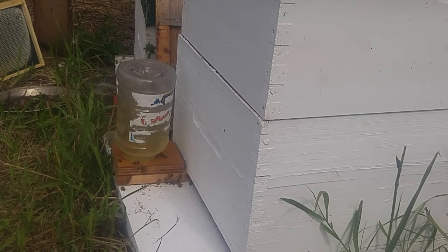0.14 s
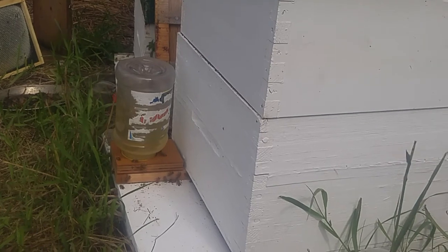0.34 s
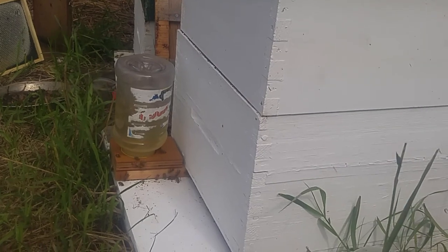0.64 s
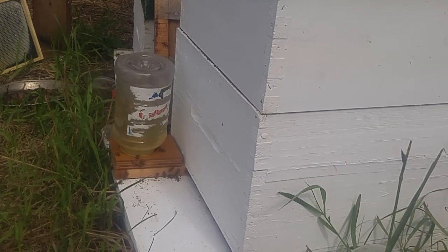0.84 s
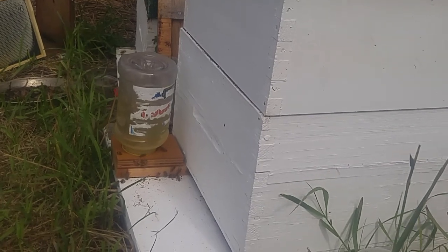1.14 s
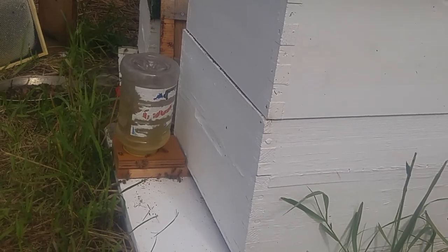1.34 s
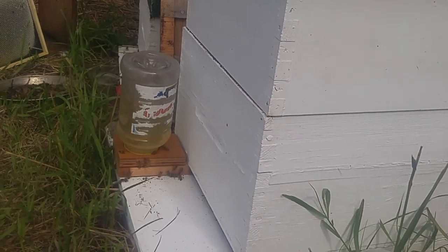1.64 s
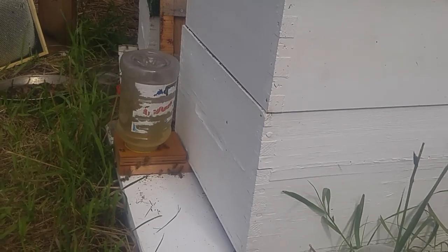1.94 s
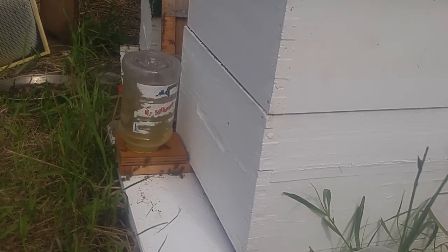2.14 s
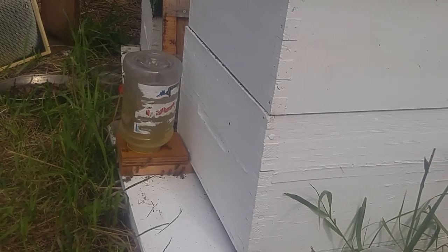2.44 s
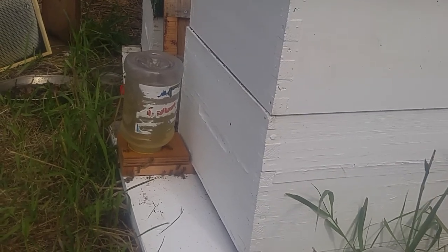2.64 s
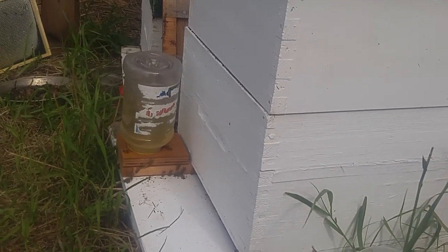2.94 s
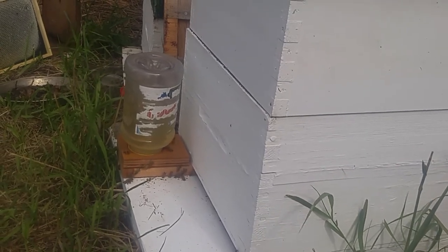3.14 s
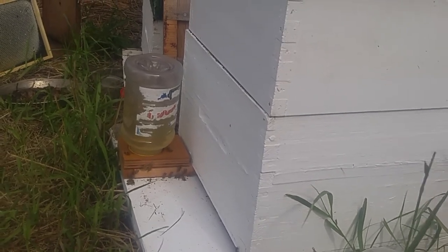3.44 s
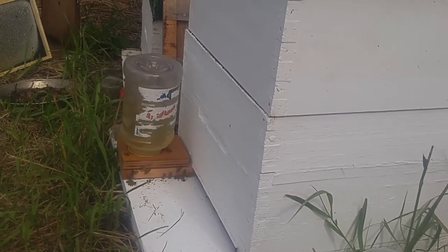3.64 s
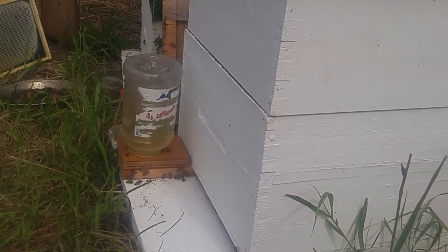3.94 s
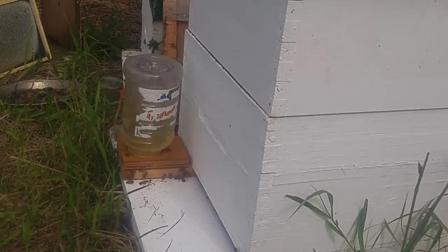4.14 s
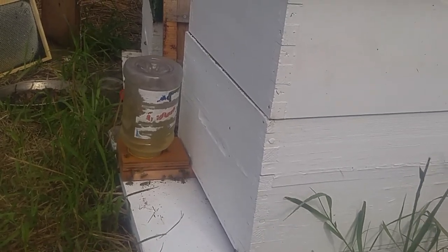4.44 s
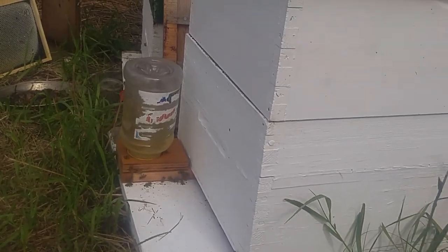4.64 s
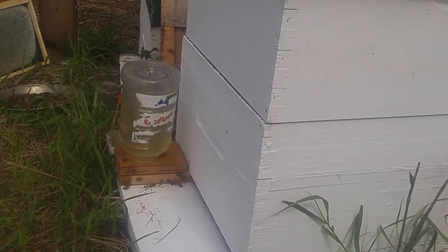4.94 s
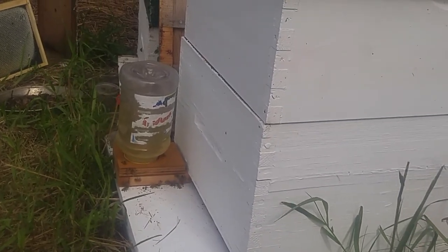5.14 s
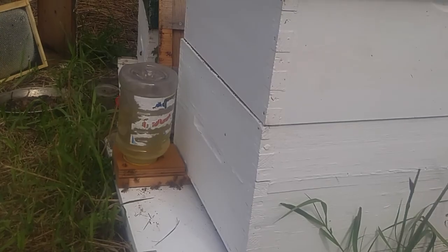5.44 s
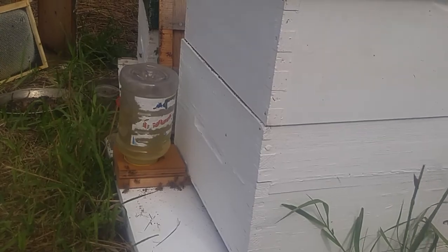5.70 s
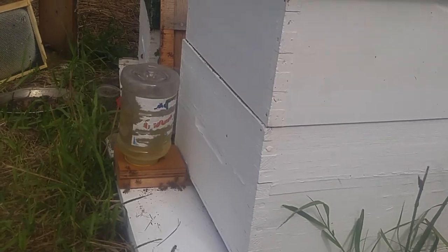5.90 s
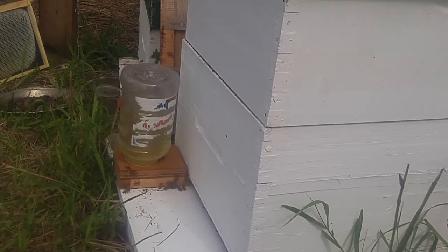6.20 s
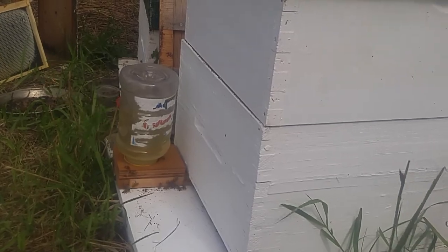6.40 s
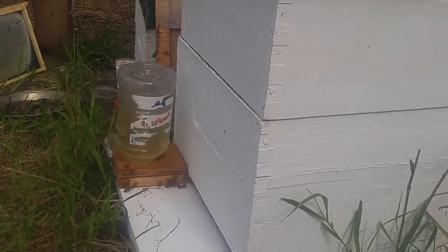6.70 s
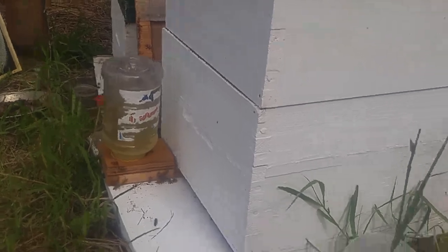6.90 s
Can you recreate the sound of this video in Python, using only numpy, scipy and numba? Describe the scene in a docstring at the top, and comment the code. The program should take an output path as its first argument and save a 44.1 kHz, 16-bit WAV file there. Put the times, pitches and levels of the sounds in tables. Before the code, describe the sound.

For the first second a single bee hovers close to the microphone with a wavering buzz, over light puffs of wind, the faint hum of a hive and a soft hiss of grass. From about 1.2 seconds the wind thumps and rumbles harder, mostly on the left, with scattered cracks. Another bee darts past at around 2.4 seconds. Faint ticks on the camera body come near 3 and 4.4 seconds. Strong gusts hit from 3.4 to 4.1 seconds and from 4.7 to 5.3, crackling and popping on the left and pushing the background down. After a short lull, the heaviest buffeting runs from about 5.9 to 6.9 seconds. Two more bees pass beneath it between 6.3 and 6.9 seconds, the last toward the right. The hum and hiss swell slightly as the wind drops at about 7 seconds.

```python
"""Wind thumps and rumbles on the two microphone ports of a hand-held camera, hardest on the left.
Eddies knock on the ports; the strongest puffs crack the left capsule and push the gain control down.
Single bees hover close and dart past, buzzing at their wingbeat. A few ticks sound on the camera body.
Behind them: the blurred hum of a beehive and a hiss of grass."""
import sys
import numpy as np
from scipy import signal
from scipy.fft import rfft, irfft
from scipy.io import wavfile
from scipy.ndimage import uniform_filter1d, minimum_filter1d
from numba import njit

SR = 44100
rng = np.random.default_rng(int(sys.argv[2]) if len(sys.argv) > 2 else 0)


def bounce(signal):
    """Save signal as a 16-bit WAV file at the path given by the first command-line argument."""
    frames = np.transpose(np.atleast_2d(signal))
    limited = np.clip(frames, -1, 1)
    pcm = np.round(limited * 32767).astype(np.int16)
    wavfile.write(sys.argv[1], SR, pcm)


N = 311346
T = np.arange(N) / SR

# gusts, [left, right] port: start_s, end_s, level_db, speed_m_s
PORT_GUSTS = [
    [(0, .11, -31.5, 2.25), (.13, .33, -25.5, 2.4), (.34, .52, -28.5, 2.1), (.55, 1.15, -40, 1.44),
     (1.17, 1.19, -19, 2.2), (1.2, 1.27, -17, 3.9), (1.36, 1.86, -17.5, 2.96), (1.92, 2.18, -19, 2.38),
     (2.21, 2.35, -14, 4.9), (2.36, 2.5, -17.5, 2.84), (2.55, 2.62, -24.5, 1.34), (2.63, 2.82, -19.5, 2.43),
     (2.84, 2.97, -18, 2.23), (3.005, 3.055, -11.5, 5.86), (3.1, 3.38, -17.5, 1.9),
     (3.39, 3.47, -10.5, 4.23), (3.5, 3.58, -10, 5.56), (3.585, 3.67, -6, 6.4), (3.69, 3.77, -9.5, 6.8),
     (3.79, 4.02, -16.5, 3.9), (4.06, 4.6, -19, 1.88), (4.66, 4.77, -10, 2.98), (4.77, 4.94, -4, 5.97),
     (4.85, 4.9, 0.5, 9.6), (5.0, 5.245, -5, 5.6), (5.255, 5.31, -14, 3.9), (5.32, 5.41, -22.5, 1.2),
     (5.43, 5.84, -26, 1.04), (5.87, 5.94, -2.5, 4.6), (5.95, 6.04, -1.5, 7.4), (6.04, 6.29, -2.5, 7),
     (5.98, 6.015, 3, 11.8), (6.31, 6.41, -14, 1.9), (6.44, 6.55, -8, 5.4), (6.57, 6.745, -4, 6.57),
     (6.79, 6.93, -12, 3.5), (6.95, 7.06, -20.5, 1.54)],
    [(.12, .64, -30, 1.7), (.8, 1.05, -37.5, 1.23), (1.1, 1.95, -38.5, 0.86), (2.3, 2.7, -34, 1.3),
     (3.07, 3.4, -28, 1.25), (3.15, 3.27, -22, 2.8), (3.7, 3.96, -28, 1.67), (4.18, 4.7, -29, 1.48),
     (5.42, 5.8, -29, 1.83), (6.0, 6.64, -23.5, 1.4), (6.78, 7.06, -27.5, 1.8)],
]
# short puffs, [left, right] port: time_s, level_db, speed_m_s
PORT_PUFFS = [
    [(.182, -17.5, 1.65), (.26, -18, 2.1), (.425, -14, 2.9), (.47, -21, 3.9), (.847, -26, 3.9),
     (.914, -21, 1.55), (1.109, -24.5, 4.3), (1.205, -9.5, 5), (1.252, -13, 3.7), (1.321, -14.5, 4.5),
     (1.409, -11, 4.3), (1.449, -12, 4.5), (1.5, -11, 5.4), (1.528, -9.5, 6.7), (1.658, -13.5, 4.6),
     (1.712, -10, 4.65), (1.78, -8.5, 3.6), (1.98, -7.5, 4), (2.01, -12, 5.3), (2.035, -11.5, 4.75),
     (2.23, -6.5, 7.8), (2.272, -6, 1.8), (2.302, -9, 8.4), (2.338, -8.5, 8.2), (2.487, -16.5, 4.7),
     (2.66, -14.5, 2.4), (2.702, -11.5, 2.8), (2.78, -16, 3), (2.885, -6, 2.96), (2.975, -10.5, 4.3),
     (3.002, -4.5, 7.2), (3.126, -11.5, 6.9), (3.172, -8.5, 5), (3.358, -12, 3.2), (3.557, -12.5, 8.7),
     (3.605, 2.5, 8.2), (3.742, -2.5, 7.3), (3.81, 1, 5.4), (3.872, -13, 6.6), (3.92, -2, 3.4),
     (3.94, -7, 4.4), (3.984, -2, 4.7), (4.124, -2.5, 3.06), (4.223, -15, 0.99), (4.604, -8.5, 2.8),
     (5.083, 1.5, 3.12), (5.179, 0.5, 6.4), (5.345, -13.5, 2.7), (5.44, -14, 2.9), (5.471, -15, 1.8),
     (5.555, -10, 3.66), (5.651, -15, 2.2), (5.7, -31, 2.1), (5.764, -28, 1.86), (6.057, 7.5, 6.75),
     (6.094, 6.5, 8.7), (6.196, 1, 7.9), (6.368, -6.5, 4.4), (6.432, 2.5, 5.64), (6.598, 2.5, 5.5),
     (6.656, 3, 5.35), (6.775, -4, 6), (6.874, -2, 5.5), (6.907, -4, 6.1)],
    [(.21, -19, 2.8), (.306, -21, 3.4), (.46, -16, 2.4), (.607, -19, 2.05), (.768, -13.5, 1.7),
     (.79, -18.5, 2.7), (.821, -20.5, 1.4), (.915, -31, 1.3), (1.017, -19.5, 1.05), (1.116, -24, 1),
     (1.301, -21, 0.66), (1.68, -27, 1.6), (2.317, -29, 0.95), (3.07, -28, 2.54), (3.744, -10, 2.6),
     (3.777, -15.5, 2.63), (3.927, -21, 0.55), (4.194, -14, 1.6), (4.376, -24.5, 3.3), (4.449, -19, 1.23),
     (4.6, -13, 1.14), (5.169, -28, 1.18), (5.48, -25, 2.7), (5.59, -18.5, 3.1), (5.627, -28.5, 3.9),
     (5.755, -30, 2.1), (5.8, -25, 2.15), (6.584, -7.5, 3.5)],
]
# wind cracks on the left capsule: time_s, level_db, width_ms
CAPSULE_CRACKS = [(1.198, -2.5, 2.2), (1.213, -4, 2.1), (1.251, -18, 1.4), (1.32, -6.5, 1.8),
                  (1.449, -2, 2.3), (1.494, -12, 1.5), (1.518, -4.5, 1.62), (1.527, -15, 1.45),
                  (1.657, -15, 2.1), (1.719, -11, 1.4), (1.98, -11, 2), (2.01, -16, 1.9), (2.031, -14, 1.9),
                  (2.218, -7, 0.96), (2.229, -9, 0.74), (2.301, -8, 1.28), (2.328, -26, 1.33),
                  (2.338, -20.5, 0.4), (2.878, -13, 2.2), (2.892, -6.5, 2.94), (2.976, -1.5, 1.95),
                  (2.997, -3, 0.61), (3.015, -1, 1.6), (3.034, 3, 1.33), (3.054, -0.5, 1.6),
                  (3.17, -4.5, 1.86), (3.456, -16.5, 1.3), (3.497, 6.5, 2.5), (3.515, 3, 1.53),
                  (3.529, 6, 1.6), (3.537, -4, 1.32), (3.558, -2, 1.6), (3.594, 3.5, 0.8), (3.606, 1, 0.22),
                  (3.624, -1, 0.43), (3.649, -1, 1.1), (3.694, 5.5, 1), (3.736, -1, 1.18),
                  (3.743, -12, 1.12), (3.755, -12, 0.9), (3.81, -0.5, 1.23), (3.919, 1, 2.2),
                  (3.937, 2.5, 1.42), (3.978, 2.5, 1.45), (4.008, -0.5, 1.96), (4.766, -2.5, 1.84),
                  (4.78, 5, 1.3), (4.803, 1.5, 1.48), (4.822, 4, 1.1), (4.835, 2, 0.99), (4.842, -18, 0.24),
                  (4.85, 4.5, 0.48), (4.8545, 6, 0.23), (4.8585, -1, 0.16), (4.8645, 3, 0.11),
                  (4.8695, 4.5, 0.18), (4.876, 5, 0.21), (4.886, 1, 0.4), (4.8935, -8, 0.2),
                  (4.896, -5, 0.23), (4.901, -6, 0.22), (4.921, -6, 0.81), (4.931, 2, 1.13),
                  (5.083, 3.5, 0.4), (5.122, 3, 1.12), (5.143, 1, 0.94), (5.175, -2, 0.92),
                  (5.198, -6.5, 1.2), (5.23, -3, 1.43), (5.238, 5.5, 1.38), (5.552, -5, 3.2),
                  (5.888, 0, 1.8), (5.904, 7.5, 1.4), (5.918, 3.5, 1.3), (5.956, 3.5, 1.03),
                  (5.966, 3.5, 0.43), (5.982, 1.5, 0.2), (5.994, 6, 0.14), (5.998, 6, 0.31),
                  (6.017, 3.5, 0.22), (6.094, 3, 0.28), (6.106, -1, 0.83), (6.118, 5, 1.02),
                  (6.128, -5, 1.1), (6.136, -6, 0.94), (6.151, 0, 1.2), (6.181, -4, 0.75), (6.193, 5, 0.86),
                  (6.239, -0.5, 0.99), (6.252, 7.5, 1.23), (6.298, -1, 0.82), (6.428, 11, 1.01),
                  (6.445, 4.5, 1.3), (6.48, -5, 0.88), (6.494, 0.5, 1.23), (6.538, -6, 1.32),
                  (6.578, 0.5, 1.38), (6.592, 2, 1.25), (6.598, 1.5, 1.06), (6.618, 2, 1.6),
                  (6.639, 8, 1.28), (6.66, -4, 1.1), (6.683, -9, 1.17), (6.705, -7.5, 0.98),
                  (6.716, 7.5, 1.4), (6.738, -5, 1.08), (6.773, 9, 1.07), (6.872, -3.5, 0.93),
                  (6.903, 11.5, 1.8)]
# near bees, one list per flight: time_s, wingbeat_hz, level_db, left_minus_right_db
BEE_FLIGHTS = [
    [(0, 272, -41, -2), (.09, 266, -55, -2), (.12, 273, -38, -5), (.16, 264, -37, -6), (.26, 263, -40, -3),
     (.3, 268, -47, -2), (.37, 283, -42, -1), (.405, 262, -46, -2), (.45, 274, -45, -3), (.5, 284, -39, -5),
     (.58, 274, -46, 3), (.65, 263, -39, 0), (.7, 265, -46, -2), (.72, 265, -60, -2), (.79, 283, -51, -2),
     (.95, 281, -62, 0), (1.3, 280, -66, 0)],
    [(2.3, 252, -60, 0), (2.4, 250, -40, 0), (2.48, 242, -43, -2), (2.7, 236, -60, -2)],
    [(6.25, 240, -60, -3), (6.36, 243, -45, -3), (6.65, 234, -46, -3), (6.72, 232, -60, -3)],
    [(6.75, 281, -58, -12), (6.78, 277, -39, -12), (6.81, 269, -36, -12), (6.84, 261, -43, -12),
     (6.92, 255, -55, -8)],
]
# wingbeat harmonics, fundamental first: gain_db
WING_HARMONICS_DB = [2, -4, -14, -15, -21, -29, -33, -36, -40]
# ticks on the camera body: time_s, impulse_db, left_minus_right_db
BODY_TICKS = [(2.991, -21.5, -13), (4.399, -17.5, -11.5), (4.68, -33, -17)]
# base spectrum of hive murmur and grass hiss: freq_hz, density_db_per_hz
AMBIENT_SPECTRUM = [(150, -94), (400, -84.5), (800, -97), (1200, -98), (1700, -100), (2300, -103),
                    (3000, -101), (4500, -100), (8000, -99.5), (12000, -97.5), (15500, -102)]
# gains on that spectrum: time_s, murmur_db, hiss_db
AMBIENT_GAINS = [(0, 11.5, 0.5), (.2, 12, 3), (.45, 9, 2), (1, 7.5, 1.5), (1.7, 10.5, 1.5), (2.5, 11, 2),
                 (3.299, 11.5, 2), (4.2, 18, 6), (4.7, 11.5, 5), (5.4, 12, 2.5), (5.9, 17, 8),
                 (6.399, 16.5, 7), (6.901, 20, 9), (6.97, 30.5, 14), (7.06, 23, 12.5)]
# resonances, [left, right] port: centre_hz, width_hz, gain_db
PORT_RESONANCES = [
    [(8420, 570, 13.5), (9600, 5600, 6.5)],
    [(7064, 900, 16.5), (8060, 390, 6.5)],
]
# camera response, two dips and a bump: centre_hz, width_hz, gain_db
CAMERA_EQ = [(501.2, 189, -19), (652, 230, 5.5), (7800, 130, -16)]

CALM_DB, FLUTTER_DB = [-41, -41.5], [1, 2]  # left, right
GUST_RISE_S, GUST_FALL_S, PUFF_RISE_S, PUFF_FALL_S = 0.0113, 0.0125, 0.0069, 0.012
POPS_PER_S, POP_ONSET_M_S, POP_ONSET_WIDTH_MS = 100, 5.1, 2.08
POP_OVER_WIND_DB, POP_SPREAD_DB = 1, 4


def airflow(side, calm_m_s=0.79, edge_speed_share=0.66, flap_db=2.2):
    """Air power and speed at one port; the speed is the power-weighted mean of calm air, every gust and every
    puff."""
    power = np.full(N, undb(2 * CALM_DB[side]))
    weighted_speed = power * calm_m_s
    flutter = undb(2 * (FLUTTER_DB[side] * walk(22) + flap_db * walk(70)))
    events = [(*gust, GUST_RISE_S, GUST_FALL_S, flutter) for gust in PORT_GUSTS[side]]
    events += [(s, s, db, m_s, PUFF_RISE_S, PUFF_FALL_S, np.ones(N)) for s, db, m_s in PORT_PUFFS[side]]
    for start_s, end_s, level_db, speed_m_s, rise_s, fall_s, wobble in events:
        span = slice(max(int((start_s - 5 * rise_s) * SR), 0), int((end_s + 5 * fall_s) * SR))
        edge = np.maximum(start_s - T[span], 0) / rise_s + np.maximum(T[span] - end_s, 0) / fall_s
        event_power = undb(2 * level_db) * np.exp(-edge ** 2) * wobble[span]
        power[span] += event_power
        progress = np.clip((T[span] - start_s + rise_s) / (end_s - start_s + rise_s + fall_s), 0, 1)
        speed_share = edge_speed_share + (1 - edge_speed_share) * np.sin(np.pi * progress)
        weighted_speed[span] += event_power * speed_m_s * speed_share
    return power, weighted_speed / power


def wind_rumble(power, speed_m_s, eddy_size_m=0.0098, eddy_db=2.5, knocks_per_s=260, knock_db=5.0):
    """Uneven eddies knock on a port; faster air carries them past sooner, so the rumble reaches higher."""
    eddy = walk(170)  # stronger is also sharper
    eddy_hz = np.clip(speed_m_s / eddy_size_m * np.exp(.13 * eddy), 40, 5000)
    hits = rng.random(N) < knocks_per_s / SR
    knocks = hits * undb(knock_db * rng.exponential(size=N)) * rng.standard_normal(N)
    turbulence = 0.069 * rng.standard_normal(N)
    rumble = (knocks + turbulence) * undb(eddy_db * eddy)
    rumble += undb(2) * band(rumble, 74.8, 34)  # large slow eddies
    for corner_ratio, damping in (1, 1.37), (1.18, 1.495), (1.69, 1.48), (2.06, 0.91):
        rumble = svf(rumble, corner_ratio * eddy_hz, damping)[0]
    rumble = low_cut(rumble, 40, order=2)
    rms = np.sqrt(smooth_twice(rumble ** 2, 900) + 1e-12)
    return rumble / rms * np.sqrt(power)


def flutter_pops(power, speed_m_s):
    """Fast air pops the capsule at a loose beat, narrower with speed. Rows: time_s, level_db, width_ms."""
    slots = np.arange(0, N - SR // 10, SR / POPS_PER_S)
    onsets = (slots + .6 * SR / POPS_PER_S * rng.random(len(slots))).astype(int)
    onsets = onsets[speed_m_s[onsets] > POP_ONSET_M_S]
    spread_db = POP_SPREAD_DB * rng.standard_normal(N)[onsets]
    level_db = 10 * np.log10(power[onsets]) + POP_OVER_WIND_DB + spread_db
    width_ms = POP_ONSET_WIDTH_MS * POP_ONSET_M_S / speed_m_s[onsets]
    return list(zip(onsets / SR, level_db, width_ms))


def capsule_cracks(power, speed_m_s, rattle_top_hz=1770, rasp_hz=1630, rasp_decay_ms=1.6):
    """Pointed pushes on the capsule, wrapped in rattle and rasp; narrower ones are brighter and raspier."""
    pulses, rasp_drive = np.zeros((2, N))
    lag_ms = np.arange(-200, 200) / SR * 1000
    for time_s, level_db, width_ms in CAPSULE_CRACKS + flutter_pops(power, speed_m_s):
        push = np.hanning(len(lag_ms)) / (1 + (2 * lag_ms / width_ms) ** 2) ** 2.2
        jags = signal.lfilter(*signal.butter(2, rattle_top_hz, fs=SR), rng.standard_normal(90))
        rattle = np.convolve(np.diff(push, prepend=0), jags * np.hanning(len(jags)), "same")
        i = int(time_s * SR)
        pulses[i - 200:i + 200] += undb(level_db) * (push + 0.49 * rattle / np.abs(rattle).max())
        rasp_drive[i] += undb(level_db) / (width_ms ** 2 + 0.011)
    pulses = low_cut(pulses, 110, order=1)  # the cracks carry little below about 110 Hz
    rasp_envelope = signal.fftconvolve(rasp_drive, np.exp(-np.abs(lag_ms) / rasp_decay_ms), "same")
    return pulses + undb(-27) * rasp_envelope * band(rng.standard_normal(N), rasp_hz, 1600, passes=3)


def wing_buzz(wingbeat_hz):
    """Harmonics that waver and swell as the body turns, plus a rasp of air at each stroke."""
    waver = 1 + .009 * walk(25) + .015 * walk(110)
    phase = 2 * np.pi * np.cumsum(wingbeat_hz * waver) / SR
    buzz = undb(-17) * (1 + np.cos(phase)) * band(rng.standard_normal(N), 1700, 2500)
    for k, gain_db in enumerate(WING_HARMONICS_DB):
        swell_db = (2.5 + k / 3) * walk(28)
        buzz += undb(gain_db + swell_db) * np.sin((k + 1) * phase + k * k)
    return buzz


def near_bees():
    """Single bees hover and dart past, gliding in pitch, level and pan."""
    time_s, *columns = np.concatenate(BEE_FLIGHTS).T
    wingbeat_hz, level_db, pan_db = (np.interp(T, time_s, column) for column in columns)
    flying = sum((T >= flight[0][0]) & (T <= flight[-1][0]) for flight in BEE_FLIGHTS)
    return flying * wing_buzz(wingbeat_hz) * stereo_gain(level_db, pan_db)


def body_ticks():
    """Short hard knocks on the camera body; the ports add their ring later."""
    impulses = np.zeros((2, N))
    for time_s, impulse_db, pan_db in BODY_TICKS:
        impulses[:, int(time_s * SR)] = stereo_gain(impulse_db, pan_db)
    return np.array([band(channel, 6700, 5100, passes=2) for channel in impulses])


def hive_bees(gain_db=-59):
    """Five far bees at the hive door, drifting in pitch, level and pan."""
    hum = np.zeros((2, N))
    for wingbeat_hz in np.linspace(205, 290, num=5):
        buzz = wing_buzz(wingbeat_hz * (1 + 0.045 * walk(3.7)))
        hum += buzz * stereo_gain(gain_db + 0.56 * walk(2.35), 2.4 * walk(0.97))
    return hum


def murmur_and_grass(crossover_hz=2000):
    """Hive murmur below the crossover, grass hiss above; both flicker slightly."""
    freq_hz = np.fft.rfftfreq(N, 1 / SR) + 1
    knot_hz, density_db = np.transpose(AMBIENT_SPECTRUM)
    spectrum = undb(np.interp(np.log(freq_hz), np.log(knot_hz), density_db)) * np.sqrt(SR / 2)
    low_share = 1 / (1 + (freq_hz / crossover_hz) ** 4)
    noise = rng.standard_normal((3, N))  # left, right, common
    murmur = irfft(rfft(.9 * noise[:2] + .4 * noise[2]) * spectrum * np.sqrt(low_share), N)
    hiss = irfft(rfft(rng.standard_normal((2, N))) * spectrum * np.sqrt(1 - low_share), N)
    time_s, murmur_db, hiss_db = np.transpose(AMBIENT_GAINS)
    murmur *= undb(np.interp(T, time_s, murmur_db) + 0.41 * walk(4.9))
    hiss *= undb(np.interp(T, time_s, hiss_db) + 0.079 * walk(6.3) + walk(45))
    return murmur + hiss


def undb(db):
    return 10 ** (np.asarray(db) / 20)


def stereo_gain(level_db, pan_db):
    return undb(level_db + np.array([pan_db, -pan_db]) / 2)


def smooth_twice(x, samples):
    return uniform_filter1d(uniform_filter1d(x, samples), samples)


def walk(rate_hz):
    """Smoothed random steps, spread near 1."""
    hold = int(SR / rate_hz)
    return 1.3 * smooth_twice(np.repeat(rng.standard_normal(N // hold + 1), hold), hold)[:N]


@njit
def svf(x, corner_hz, damping):
    """State-variable filter, moving corner. Rows: low-pass, unity-gain band-pass."""
    y, band_state, low_state = np.empty((2, len(x))), 0., 0.
    for i in range(len(x)):
        g = np.tan(np.pi * corner_hz[i] / SR)
        v = (band_state + g * (x[i] - low_state)) / (1 + g * (g + damping))
        y[0, i], y[1, i] = low_state + g * v, damping * v
        band_state, low_state = 2 * v - band_state, low_state + 2 * g * v
    return y


def band(x, centre_hz, width_hz, passes=1):
    for _ in range(passes):
        x = svf(x, np.full(N, float(centre_hz)), width_hz / centre_hz)[1]
    return x


def low_cut(x, corner_hz, order):
    return signal.sosfilt(signal.butter(order, corner_hz, "high", fs=SR, output="sos"), x)


@njit
def follow(x, attack_s, release_s):
    """One-pole level follower."""
    level, y = 0., np.empty(len(x))
    for i in range(len(x)):
        level += (x[i] - level) / (SR * (attack_s if x[i] > level else release_s))
        y[i] = level
    return y


def scene():
    """Ambience, bees and ticks ring the ports; wind adds rumble on both, cracks on the left."""
    mix = murmur_and_grass() + near_bees() + hive_bees() + body_ticks()
    flows = [airflow(side) for side in range(2)]
    for side, resonances in enumerate(PORT_RESONANCES):
        mix[side] += sum((undb(db) - 1) * band(mix[side], hz, width_hz) for hz, width_hz, db in resonances)
        mix[side] += wind_rumble(*flows[side])
    mix[0] += capsule_cracks(*flows[0])
    return mix


def record(dry, knee_db=-13, ratio=3.8, ceiling=0.91, top_hz=15800):
    """Camera chain: linked gain control, low cut, EQ, look-ahead limiter, steep low-pass."""
    rectified = uniform_filter1d(np.abs(dry).max(axis=0), size=200)
    level = follow(rectified, attack_s=0.025, release_s=1.0)
    gain = np.minimum(undb(knee_db) / (level + 1e-9), 1) ** (1 - 1 / ratio)
    x = low_cut(dry * uniform_filter1d(gain, size=200), 52, order=3)
    for centre_hz, width_hz, gain_db in CAMERA_EQ:
        x = x + (undb(gain_db) - 1) * np.array([band(channel, centre_hz, width_hz) for channel in x])
    limiter_gain = np.minimum(ceiling / (np.abs(x).max(axis=0) + 1e-9), 1)
    x = x * smooth_twice(minimum_filter1d(limiter_gain, size=257), 128)
    return signal.sosfilt(signal.ellip(10, .2, 80, top_hz, fs=SR, output="sos"), x)


dry = scene()
out = record(dry)
bounce(out)
```